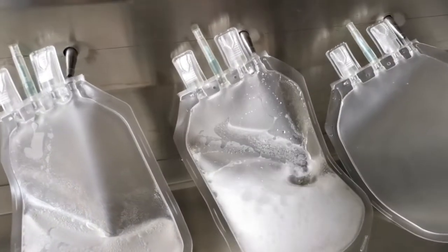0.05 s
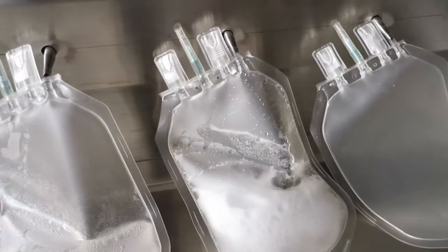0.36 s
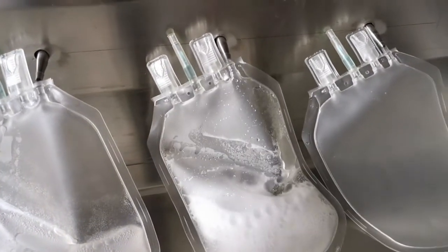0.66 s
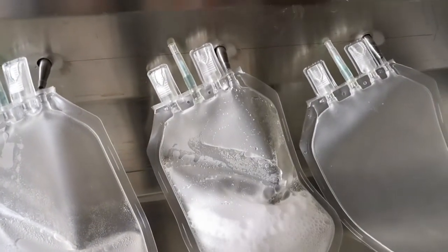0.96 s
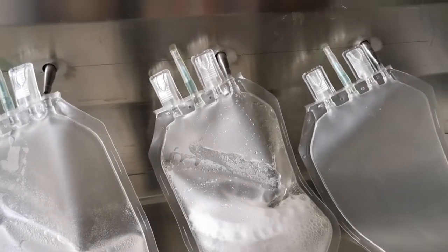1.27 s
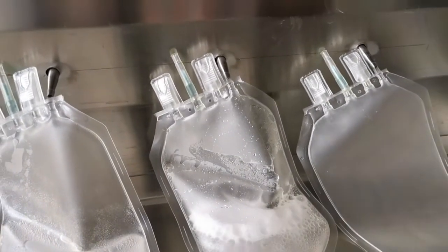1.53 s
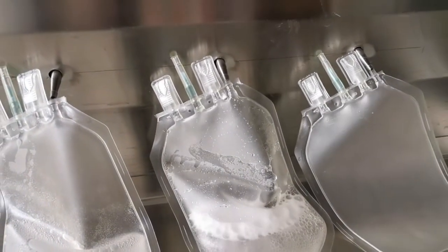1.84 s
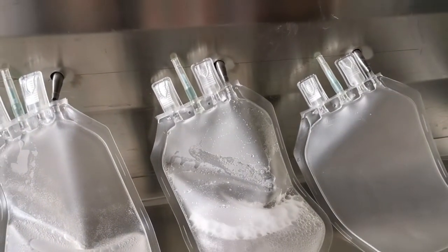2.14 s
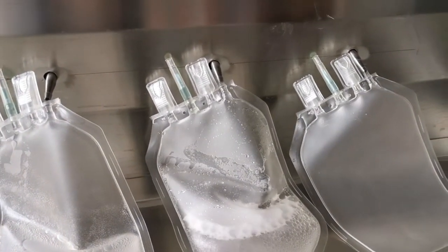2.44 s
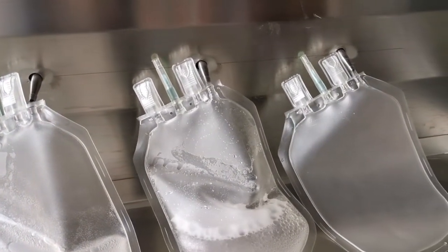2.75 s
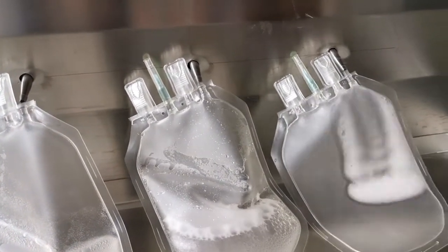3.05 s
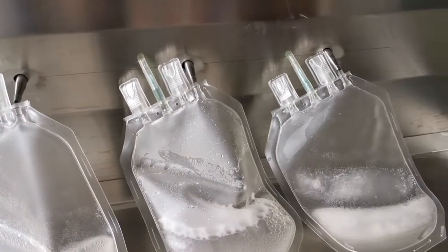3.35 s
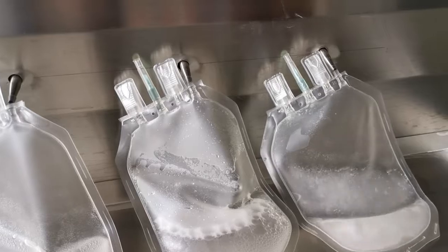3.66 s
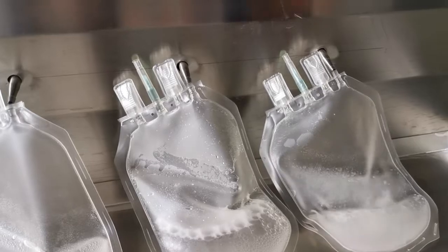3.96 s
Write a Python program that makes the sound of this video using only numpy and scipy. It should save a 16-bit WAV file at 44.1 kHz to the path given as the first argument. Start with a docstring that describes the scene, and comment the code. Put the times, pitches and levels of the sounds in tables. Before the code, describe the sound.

Filling machine humming steadily, with a valve spit, an air hiss and a fizzing liquid jet.

```python
"""Bag filling machine in a factory.

A valve spits once; later air vents for a second through a ringing pipe and shuts off with a puff.
Then a valve clacks open and a jet of liquid fizzes into the next bag.
Behind it: motor rumble, ventilation, a steady compressed-air leak and mains hum.
A gain control ducks the whole mix under the sharp hisses."""
import sys
import numpy as np
from scipy import signal
from scipy.fft import rfft, irfft
from scipy.io import wavfile
from scipy.ndimage import uniform_filter1d

SR = 44100
rng = np.random.default_rng(int(sys.argv[2]) if len(sys.argv) > 2 else 0)


def store_pcm(level_fs):
    """Save levels as 16-bit WAV."""
    pcm = np.round(np.clip(level_fs, -1, 1) * 32767).astype(np.int16)
    wavfile.write(sys.argv[1], SR, np.atleast_2d(pcm).T)


N = 176400
TIME = np.arange(N) / SR
BINS_HZ = np.fft.rfftfreq(N, 1 / SR)

# air rush (frequency [Hz], relative density [dB])
VENT_SPECTRUM = [(300, -30), (900, -8.5), (2600, -8.5), (3300, -15.5), (5100, -10), (5550, -4.5),
                 (6200, -4), (7400, -0.5), (8050, -2.5), (8600, -8.5), (10300, -19), (11800, -20),
                 (15000, -32)]
# stereo width (frequency [Hz], side minus mid [dB])
VENT_SPREAD = [(200, -16), (1000, -5), (2200, -6.5), (4000, -1.5), (7000, 3), (9000, -2), (14000, 2)]
# pipe resonances (frequency [Hz], bandwidth [Hz], level [dB])
PIPE_LOW_MODES = [(1019, 21, -35), (1402, 30, -43), (1738, 21, -34.5), (2014, 16, -38), (2260, 13, -42.5),
                  (2430, 26, -35), (2602, 38, -41), (2900, 45, -45)]
PIPE_HIGH_MODES = [(5470, 81, -48), (5750, 110, -36), (5950, 20, -58), (6500, 20, -52), (7390, 22, -36.5),
                   (7870, 32, -37), (8240, 33, -49), (8900, 90, -53)]

def vent(start_s=1.617, stop_s=2.657, attack_s=0.033, release_s=0.093, swell_s=0.039, sag_db_per_s=8.5):
    """Air rushes through a pipe; the low resonances swell, then fade as the pressure falls."""
    age = np.maximum(TIME - start_s, 0)
    flow = np.minimum(age / attack_s, 1) * np.exp(-np.maximum(TIME - stop_s, 0) / release_s)
    low_envelope = np.minimum(age / swell_s, 1) * amp(-sag_db_per_s * age)
    low_ring = low_envelope * resonances(PIPE_LOW_MODES, VENT_SPREAD)
    rush = amp(-32) * walls(noise(VENT_SPECTRUM, VENT_SPREAD, patchy_db=1.4), wet_db=-1)
    high_ring = resonances(PIPE_HIGH_MODES, VENT_SPREAD)
    return flow * (rush + low_ring + high_ring)


# valve and frame bursts (time [s], level [dB], decay [s])
SPIT_BURSTS = [(.107, -26, 0.0051), (.1125, -15.5, 0.0033), (.124, -19, 0.0094), (.137, -27, 0.016),
               (1.617, -24, 0.012)]
CLACK_BURSTS = [(3.160, -16, 0.0027), (3.166, -24, 0.049)]
PUFF_BURSTS = [(1.62, -23.5, 0.035), (1.655, -27, 0.044), (1.715, -29.5, 0.059), (2.68, -28, 0.019),
               (3.118, -30.5, .05)]
THUD_BURSTS = [(.005, -25, 0.042), (.07, -30, 0.023), (3.135, -20, 0.061)]
# burst spectra (frequency [Hz], relative density [dB])
SPIT_SPECTRUM = [(500, -38), (3000, -18), (5000, -14), (5800, -7), (6900, -2), (7900, 0.5), (8600, -13),
                 (10500, -30.5), (12500, -31), (15000, -31)]
CLACK_SPECTRUM = [(300, -19), (1500, -13), (2500, -8), (3400, -6), (4200, -7), (5300, -6), (7400, -0.5),
                  (8500, -12), (10500, -25), (15000, -31)]
PUFF_SPECTRUM = [(100, -2), (330, 11.5), (800, 2.5), (1400, -1), (3100, 1.5), (3800, -8), (4400, -6.5),
                 (7000, -11), (10000, -23), (15000, -30)]
THUD_SPECTRUM = [(30, -9), (80, 1), (125, -7), (165, 11), (230, -21), (400, -34), (900, -70)]
# stereo width, valves and jet (frequency [Hz], side minus mid [dB])
VALVE_SPREAD = [(150, -24), (1000, -9), (4000, -6.5), (7500, -5), (14000, 2)]

def valves():
    """Valves spit, clack and puff as they switch; the frame thuds."""
    spits = bursts(SPIT_BURSTS, attack_s=0.0036) * noise(SPIT_SPECTRUM, VALVE_SPREAD)
    clacks = bursts(CLACK_BURSTS, attack_s=0.0014) * noise(CLACK_SPECTRUM, VALVE_SPREAD)
    puffs = bursts(PUFF_BURSTS, attack_s=0.0073) * noise(PUFF_SPECTRUM, VALVE_SPREAD)
    thuds = bursts(THUD_BURSTS, attack_s=0.023) * noise(THUD_SPECTRUM, ROOM_SPREAD, fft_size=4096)
    return spits + clacks + puffs + thuds


# liquid jet (frequency [Hz], relative density [dB])
JET_SPECTRUM = [(200, 9), (500, -1), (1500, -10), (2700, -12), (3450, -8), (4500, -5), (7500, 3),
                (9500, -13), (12000, -13.5), (15000, -24)]
# bag resonances (frequency [Hz], bandwidth [Hz], level [dB])
BAG_MODES = [(1750, 120, -52), (2284, 76, -43), (3400, 170, -50)]

def filling(start_s=3.11, rise_s=0.022):
    """A jet of liquid hisses and rings in the bag."""
    flow = np.clip((TIME - start_s) / rise_s, 0, 1)
    hiss = amp(-39.5 + 0.65 * drift(rate_hz=60)) * noise(JET_SPECTRUM, VALVE_SPREAD, patchy_db=-1.5)
    ring = resonances(BAG_MODES, VALVE_SPREAD) * amp(2 * drift(rate_hz=14))
    return flow * (hiss + ring)


# steady noises (frequency [Hz], relative density [dB])
RUMBLE_SPECTRUM = [(20, -33), (42, -13), (56, -18), (73, -2), (92, -15), (125, -1), (160, -2.5),
                   (205, -11.5), (260, -8.5), (310, -14.5), (420, -25), (600, -62)]
FAN_SPECTRUM = [(300, -13.5), (410, -7), (600, -0.5), (820, -1.5), (1100, -4), (1260, -5), (1370, -1.5),
                (1560, -5.5), (2150, -6), (2550, -9.5), (3000, -7.5), (3230, -15), (3480, -10), (4400, -19),
                (5800, -49)]
LEAK_SPECTRUM = [(3000, -27), (4400, -4), (5100, -4.5), (5750, -1), (6700, 0), (7700, 4), (8150, -3),
                 (8800, -9.5), (9600, -9), (10800, -23.5), (12700, -16.5), (15000, -28)]
# housing resonances (frequency [Hz], bandwidth [Hz], level [dB])
HOUSING_MODES = [(503, 31, -49.5), (937, 26, -48.5), (1720, 130, -45), (2295, 54, -45), (2938, 90, -55)]
# stereo width, background and thuds (frequency [Hz], side minus mid [dB])
ROOM_SPREAD = [(60, -23), (120, -32), (260, -17), (520, -16), (1050, -7), (2300, -7), (3300, -1.5),
               (4800, 2.5), (6800, 7.5), (8200, 2), (10000, -4.5), (14500, -3)]

def factory():
    """Motors rumble, fans blow, compressed air leaks and the machine's housing rings."""
    rumble = amp(-30.5) * noise(RUMBLE_SPECTRUM, ROOM_SPREAD, patchy_db=1.6, fft_size=4096)
    fans = amp(-33 + 0.4 * drift(rate_hz=10)) * noise(FAN_SPECTRUM, ROOM_SPREAD, patchy_db=1)
    leak = amp(-39 + 0.064 * drift(rate_hz=28)) * noise(LEAK_SPECTRUM, ROOM_SPREAD, patchy_db=1.2)
    return rumble + walls(fans, wet_db=-9) + resonances(HOUSING_MODES, ROOM_SPREAD) + walls(leak, -8.5)


# hum envelope (time [s], level [dB])
HUM_ENVELOPE = [(0, -21), (.7, -21), (1.5, -21.5), (2.0, -21.2), (2.5, -23.5), (3.0, -22), (3.4, -22.5),
                (4, -22)]
# hum partials (harmonic number, relative level [dB])
HUM_HARMONICS = [(1, -1), (2, -27.5), (3, -31)]

def mains_hum(pitch_hz=100.03, wobble_db=0.64):
    """Three harmonics of mains hum with a fluttering level."""
    level = amp(np.interp(TIME, *np.transpose(HUM_ENVELOPE)) + wobble_db * drift(rate_hz=38))
    tone = sum(amp(db) * np.sin(2 * np.pi * (k * pitch_hz * TIME + rng.random()))
               for k, db in HUM_HARMONICS)
    return level * unit(tone)


# motor tones (frequency [Hz], rms deviation [Hz], level [dB])
MOTOR_TONES = [(43.4, 3.4, -46), (147.7, 4.33, -36), (591.4, 9.6, -54.5)]

def motors():
    """Motor tones waver in pitch and level."""
    out = 0
    for hz, deviation_hz, db in MOTOR_TONES:
        cycles = np.cumsum(hz + deviation_hz * drift(rate_hz=14.3)) / SR
        out += amp(db) * unit(np.sin(2 * np.pi * cycles) * amp(1.7 * drift(rate_hz=5.8)))
    return out


def walls(x, wet_db, decay_s=0.022):
    """Short reflections in the steel enclosure ripple the spectrum of a hiss."""
    t = np.arange(4096) / SR
    tail = rng.standard_normal((2, len(t))) * np.exp(-t / decay_s)
    response = ((t == 0) + amp(wet_db) * tail / np.linalg.norm(tail[0])) / np.hypot(1, amp(wet_db))
    mid_side = np.array([x[0] + x[1], x[0] - x[1]]) / 2
    mid, side = signal.fftconvolve(mid_side, response, axes=1)[:, :N]
    return np.array([mid + side, mid - side])


def noise(spectrum, spread, patchy_db=0, fft_size=1024):
    """Coloured stereo noise with turbulent patches; mid rms 1."""
    hz = np.fft.rfftfreq(fft_size, 1 / SR)
    frames = N * 4 // fft_size + 5
    mid_re, mid_im, side_re, side_im, patches = rng.standard_normal((5, frames, len(hz)))
    patches = uniform_filter1d(patches, size=8, axis=0)
    patches = unit(uniform_filter1d(patches, size=12, axis=1))
    bins = np.array([mid_re + 1j * mid_im, (side_re + 1j * side_im) * amp(lookup(spread, hz))])
    bins *= amp(lookup(spectrum, hz) + patchy_db * patches)
    mid, side = signal.istft(bins.swapaxes(1, 2), nperseg=fft_size, noverlap=fft_size * 3 // 4)[1][:, :N]
    return np.array([mid + side, mid - side]) / np.std(mid)


def resonances(modes, spread):
    """Turbulence ringing in narrow resonances."""
    out = np.zeros((2, N))
    for centre_hz, band_hz, db in modes:
        response = (1 + 1j * (BINS_HZ - centre_hz) / band_hz) ** -2
        mid, side = (unit(irfft(rfft(x) * response, N)) for x in rng.standard_normal((2, N)))
        side *= amp(lookup(spread, centre_hz))
        out += amp(db) * unit(np.array([mid + side, mid - side]))
    return out


def bursts(rows, attack_s):
    """Envelope of bursts summed in power: linear rise, exponential decay."""
    power = 0
    for start_s, db, decay_s in rows:
        age = np.maximum(TIME - start_s, 0)
        shape = np.minimum(age / attack_s, 1) * np.exp(-np.maximum(age - attack_s, 0) / decay_s)
        power += (amp(db) * shape) ** 2
    return np.sqrt(power)


def drift(rate_hz):
    """Slow random motion, rms 1."""
    return unit(irfft(rfft(rng.standard_normal(N)) * np.exp(-(BINS_HZ / rate_hz) ** 2), N))


def lookup(table, hz):
    """Interpolation on a log-frequency axis."""
    knots_hz, values = np.transpose(table)
    return np.interp(np.log(hz + 1), np.log(knots_hz + 1), values)


def amp(db):
    """Decibels to gain."""
    return 10 ** (np.asarray(db) / 20)


def unit(x):
    """Scales to rms 1."""
    return x / np.sqrt(np.mean(x ** 2) + 1e-20)


# stereo balance (frequency [Hz], left minus right [dB])
BALANCE = [(100, 0.18), (600, .5), (1300, -2.5), (2450, -6), (3000, -4), (3500, 0.5), (4500, 1.6),
           (5400, 0), (6200, -2.5), (7600, -2.5), (8600, -2), (10000, -3.5), (12500, -3)]

def scene():
    """All sources, leaning left or right by frequency."""
    mix = mains_hum() + motors() + factory() + vent() + valves() + filling()
    lean_db = lookup(BALANCE, BINS_HZ) / 2
    return irfft(rfft(mix) * amp([lean_db, -lean_db]), N)


AGC_SENSE_HZ, AGC_THRESHOLD_DB, AGC_SLOPE, AGC_RECOVERY_DB_PER_S = 3520, -29.5, 0.4, 57
BAND_LIMIT_HZ = 15150

def record(dry):
    """Gain control keyed by treble, then the band limit."""
    treble = signal.sosfilt(signal.butter(2, AGC_SENSE_HZ, "high", fs=SR, output="sos"), dry)
    treble_db = 10 * np.log10(abs(uniform_filter1d((treble ** 2).mean(0), size=300)) + 1e-12)
    recovery_db = TIME * AGC_RECOVERY_DB_PER_S
    held_db = np.maximum.accumulate(treble_db + recovery_db) - recovery_db
    over_db = np.maximum(held_db - AGC_THRESHOLD_DB, 0)
    ducked = dry / amp(AGC_SLOPE * uniform_filter1d(over_db, size=200))
    lowpass = signal.firwin(511, BAND_LIMIT_HZ, window=("kaiser", 9), fs=SR)
    return signal.oaconvolve(ducked, lowpass[None], "same")


dry = scene()
out = record(dry)
store_pcm(out)
```